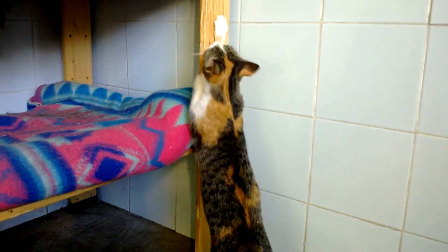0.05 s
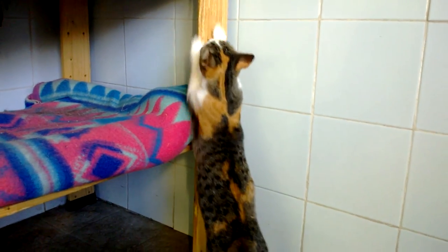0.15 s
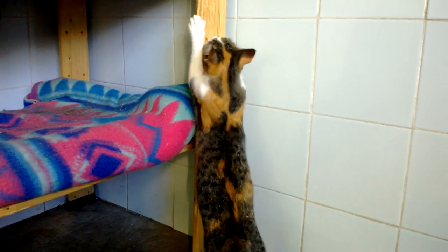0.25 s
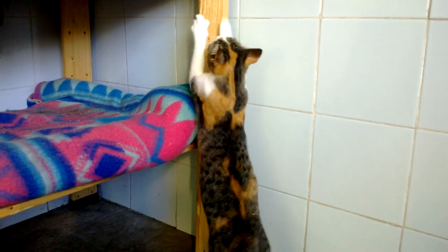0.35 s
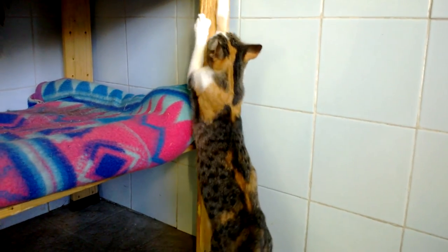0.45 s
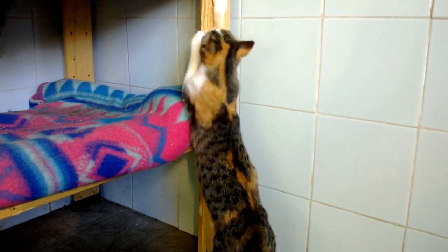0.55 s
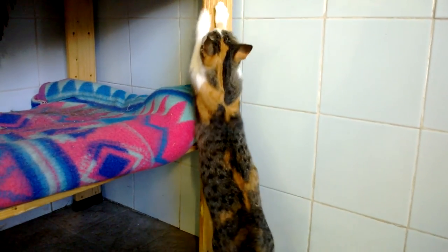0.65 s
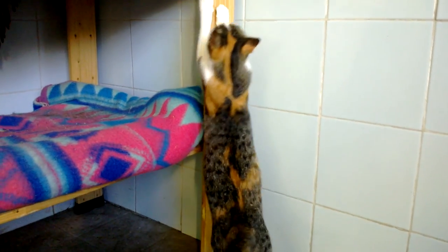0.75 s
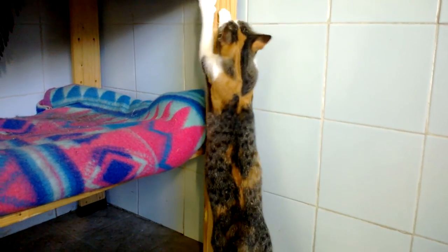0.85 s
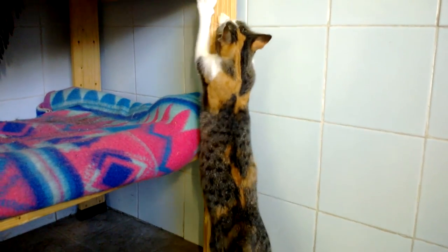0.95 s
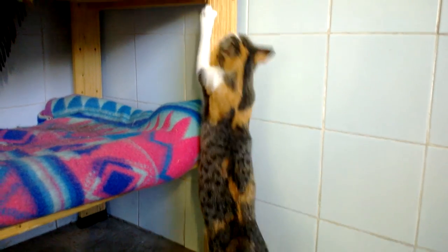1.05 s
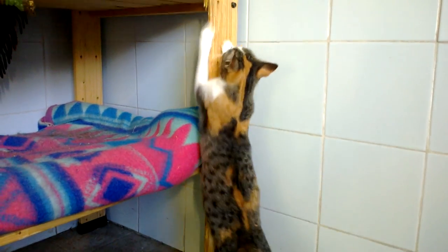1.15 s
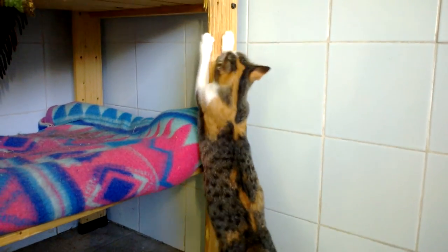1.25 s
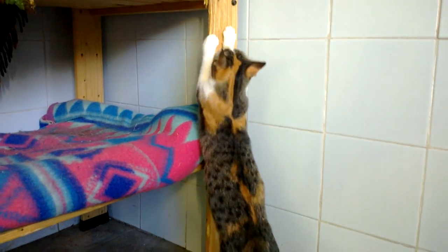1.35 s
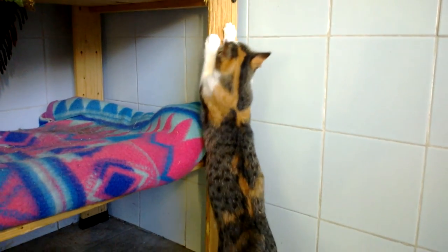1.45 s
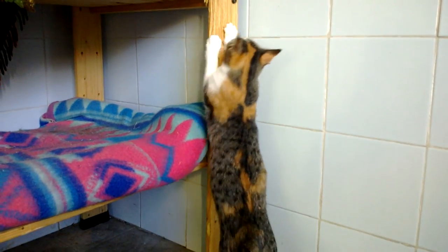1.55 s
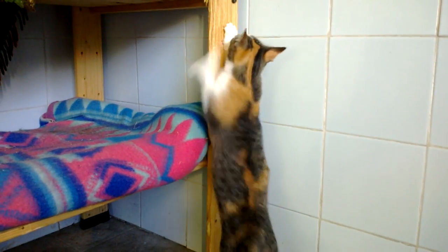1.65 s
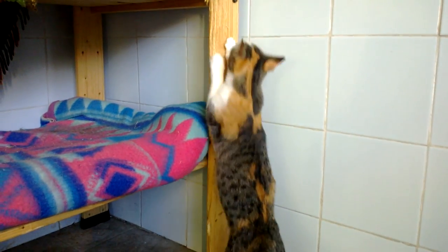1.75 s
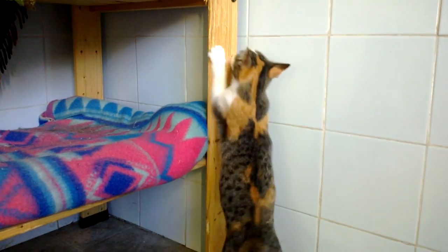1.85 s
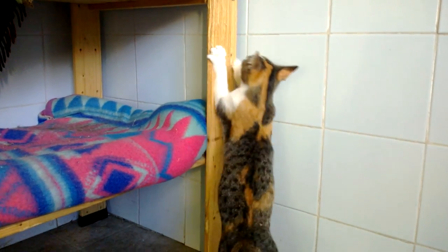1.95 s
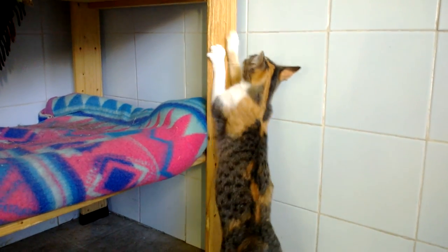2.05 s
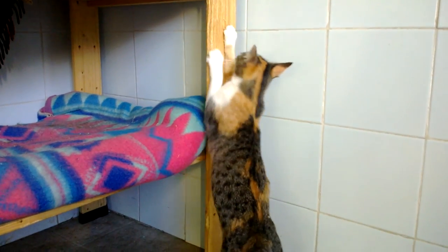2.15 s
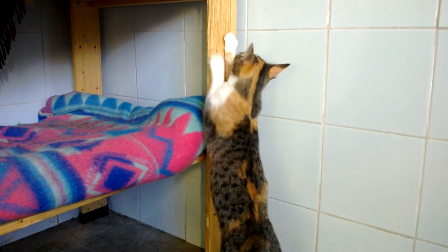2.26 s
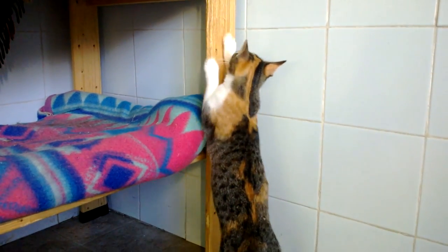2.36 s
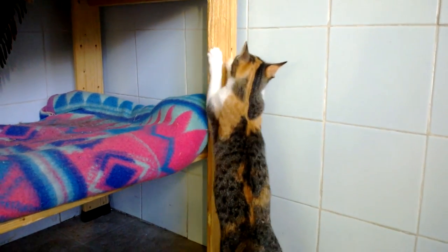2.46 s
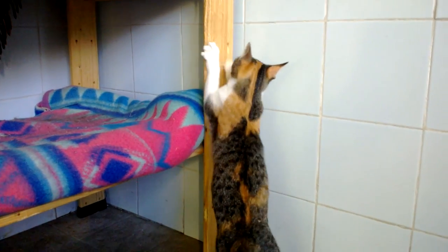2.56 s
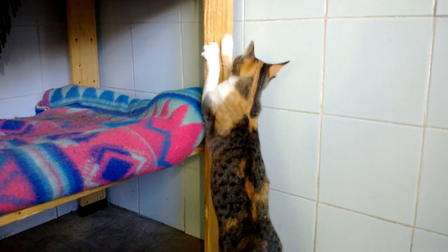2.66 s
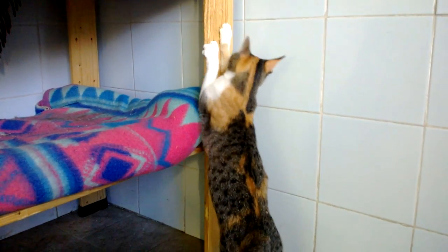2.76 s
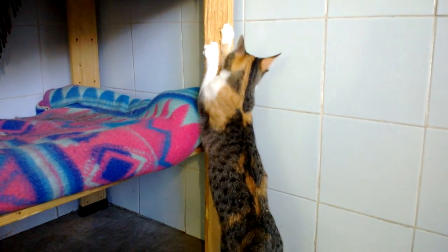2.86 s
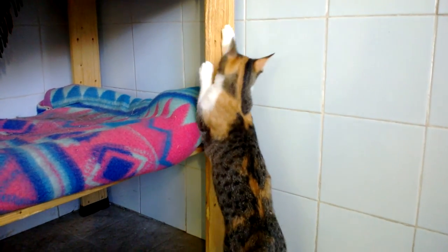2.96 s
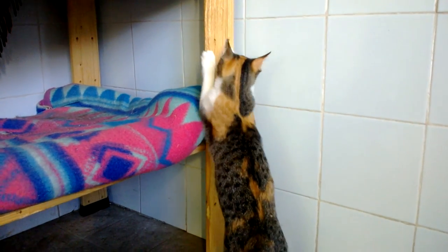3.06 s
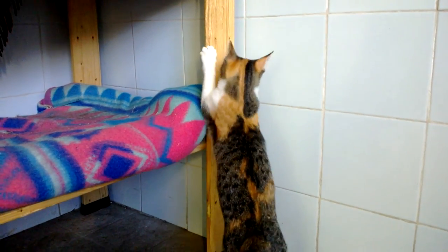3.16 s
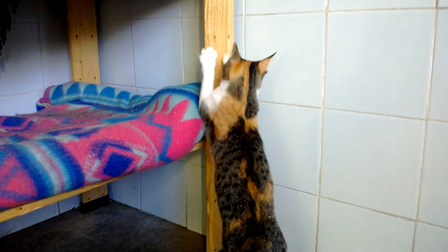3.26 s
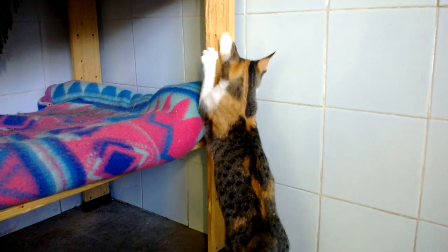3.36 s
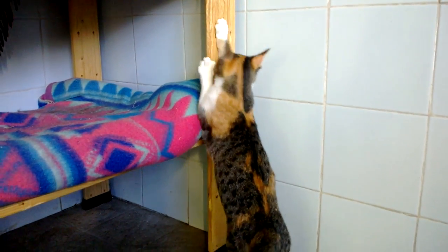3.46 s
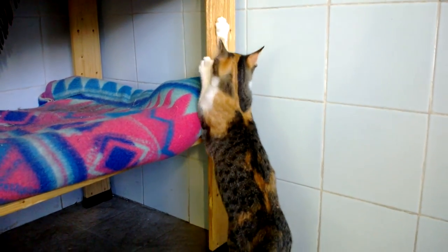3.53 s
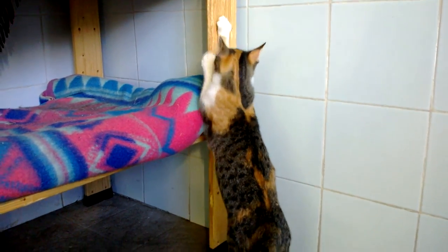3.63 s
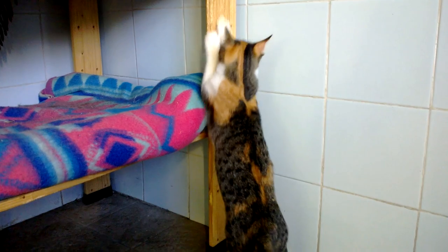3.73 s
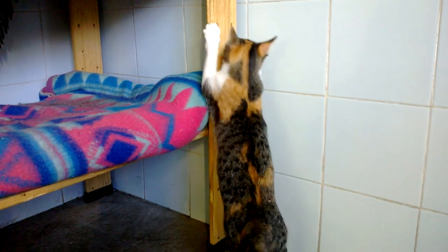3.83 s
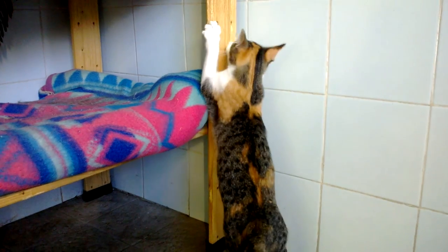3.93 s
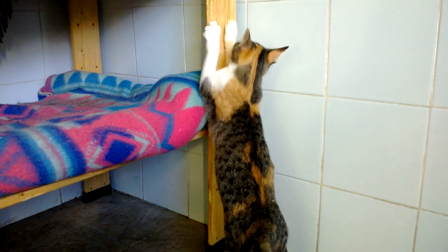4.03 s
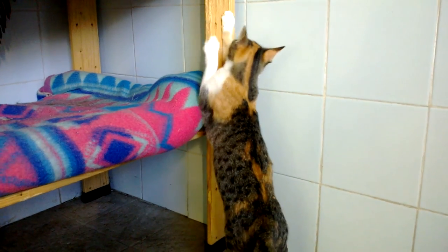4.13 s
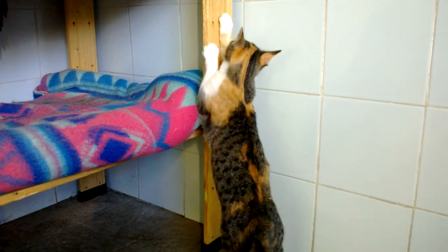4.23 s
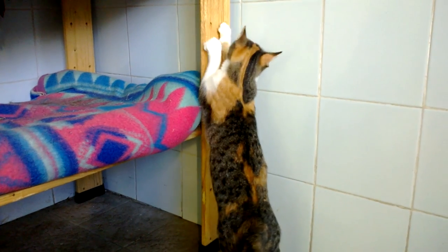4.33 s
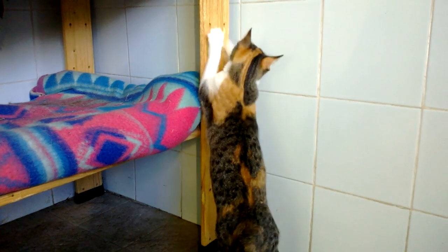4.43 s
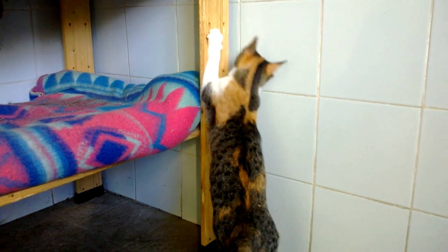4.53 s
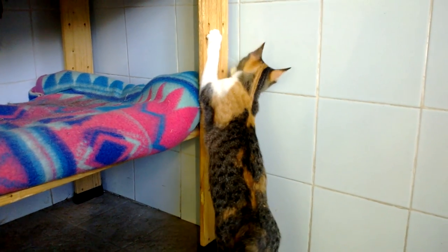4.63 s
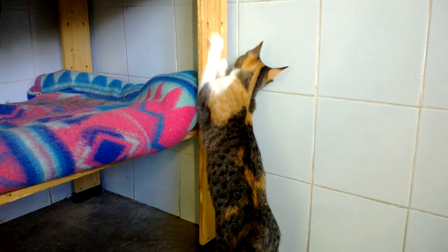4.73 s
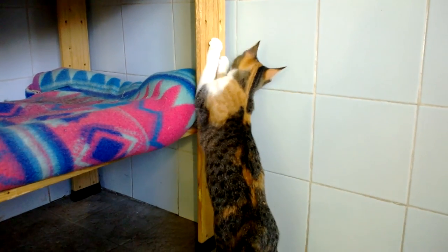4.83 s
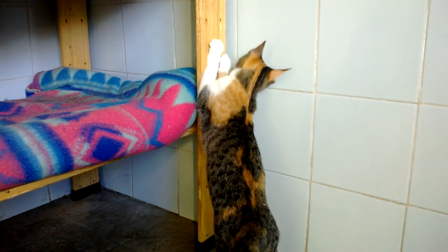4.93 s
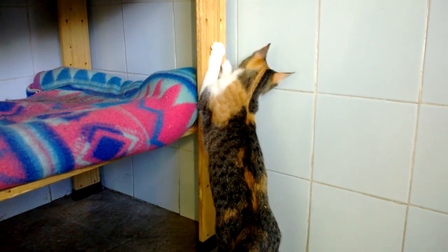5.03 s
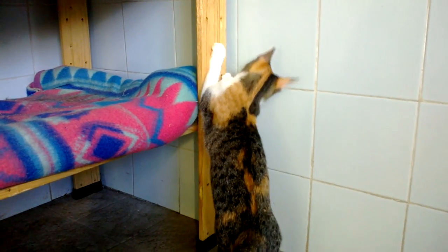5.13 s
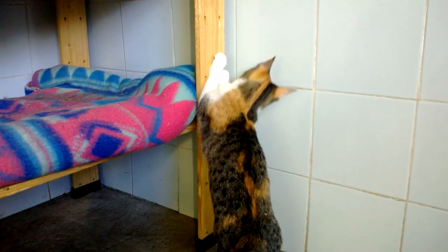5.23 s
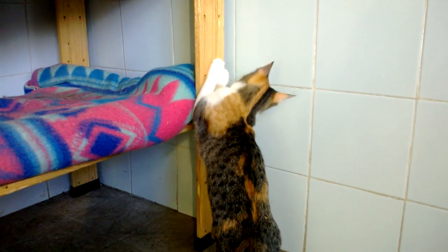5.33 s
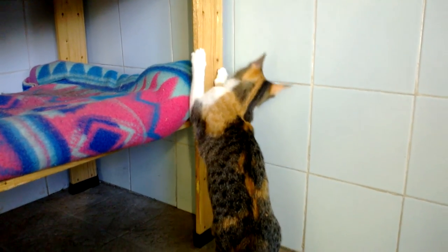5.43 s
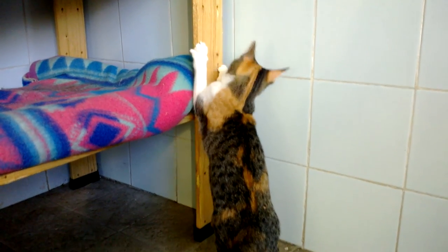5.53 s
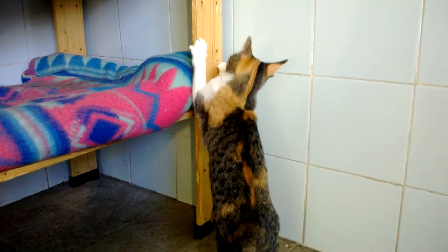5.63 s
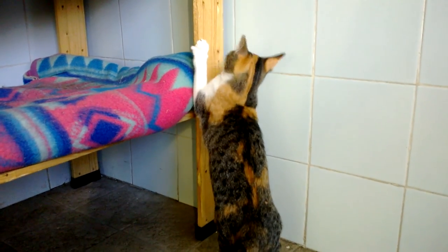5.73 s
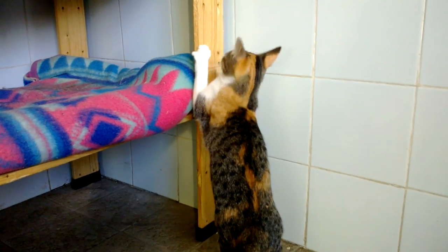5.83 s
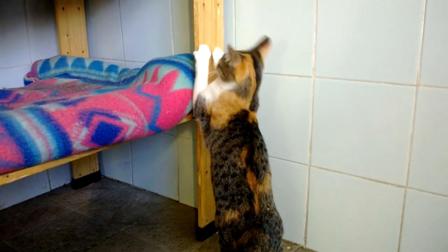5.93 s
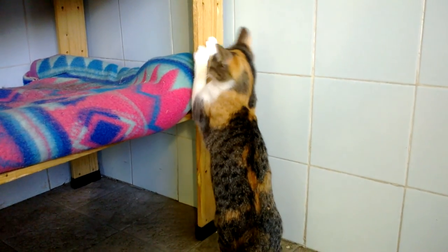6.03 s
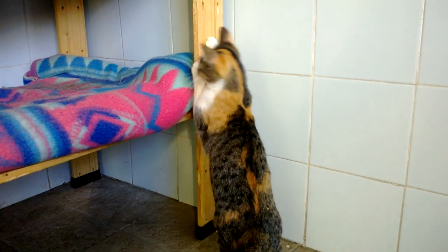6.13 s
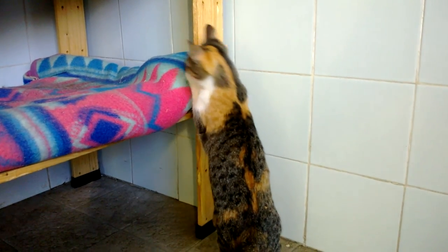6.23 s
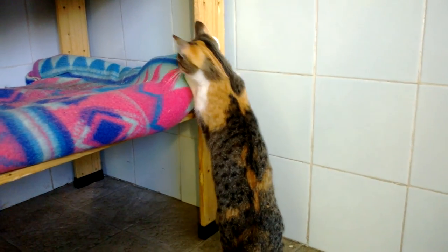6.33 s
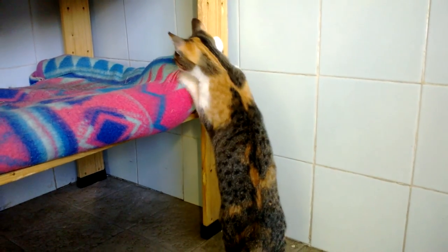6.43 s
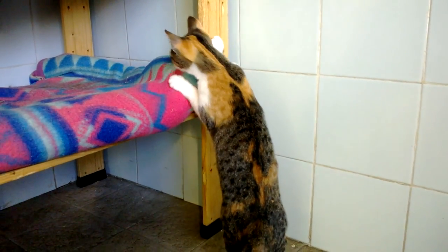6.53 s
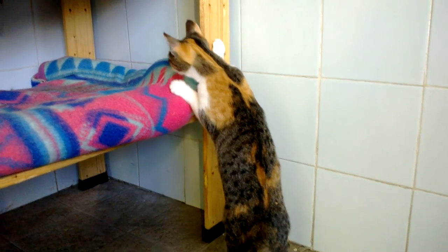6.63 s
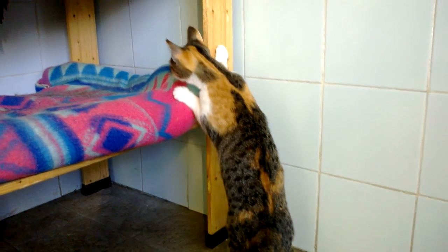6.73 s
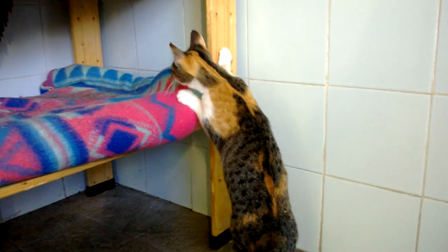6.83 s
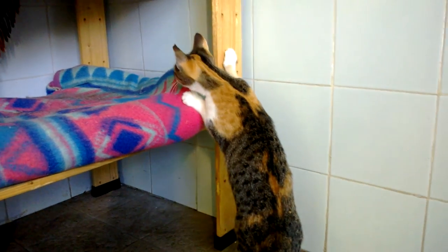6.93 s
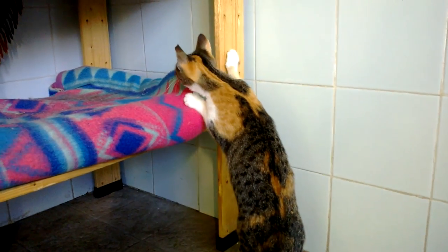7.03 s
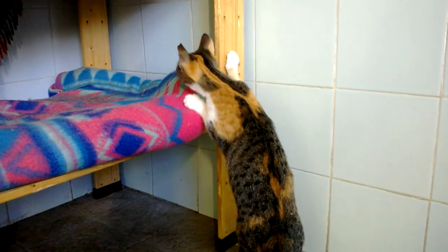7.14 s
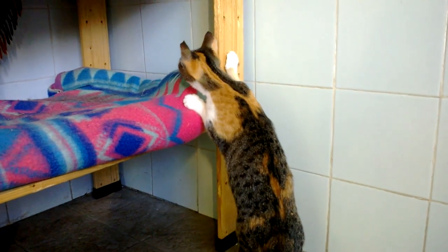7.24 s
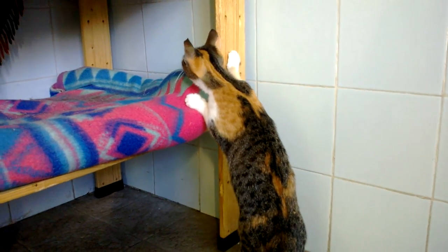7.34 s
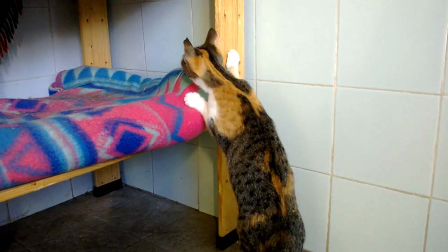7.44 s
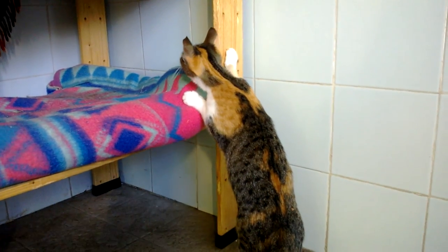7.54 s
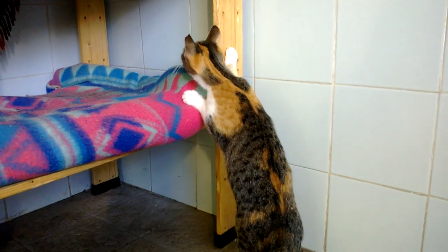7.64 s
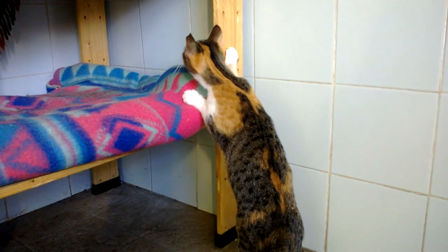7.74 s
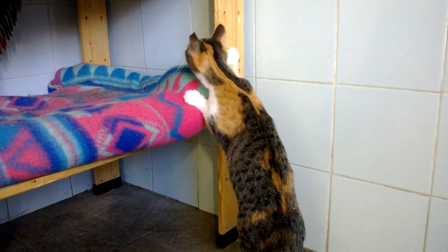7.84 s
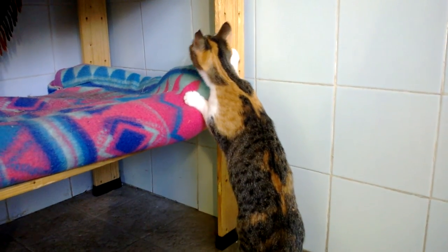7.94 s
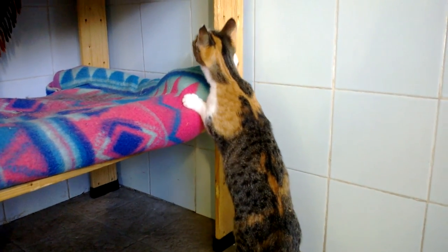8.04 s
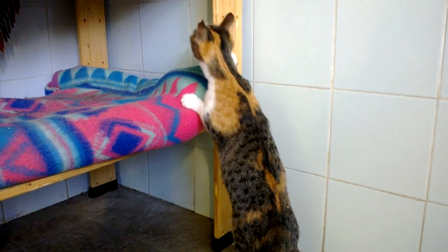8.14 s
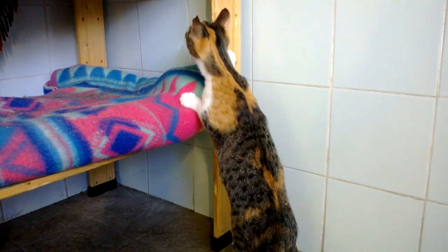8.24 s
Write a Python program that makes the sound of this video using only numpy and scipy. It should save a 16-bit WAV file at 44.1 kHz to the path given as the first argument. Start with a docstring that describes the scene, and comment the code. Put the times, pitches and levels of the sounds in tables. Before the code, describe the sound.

Close by, a cat scratches a wooden post in a small tiled room. Short raspy scrapes overlap with crisp ticks and woody knocks, uneven and busy, with brief hard echoes. A low rumble and a wavering bass hum swell softly underneath. After about five seconds the scratching thins, one loud snap follows, then only faint ticks remain while the hum grows.

```python
"""A cat stretches up a wooden bed post in a small tiled room and drags its claws down it.
From the start, filtered noise makes a soft room rumble, and a wavering sine hums in short swells.
Claws scrape (shaped noise) and snap free (short noise bursts); the post rings and the tiles echo.
From about 4.5 s a few faint breathy tones and soft rubs join in: noise through a ringing filter.
After about 5.3 s the hum stays and grows; the claws turn sparse, snap loudly near 5.7 s, then go faint."""
import sys
import numpy as np
from scipy import signal
from scipy.io import wavfile

SR = 44100
rng = np.random.default_rng(int(sys.argv[2]) if len(sys.argv) > 2 else 0)


def log_audio(samples):
    """Write samples as a 16-bit WAV file to the path given in sys.argv[1]."""
    # one column per channel
    frames = np.atleast_2d(samples).T
    # limit to full scale, then quantise
    limited = np.clip(frames, -1, 1)
    pcm = np.round(limited * 32767).astype(np.int16)
    wavfile.write(sys.argv[1], SR, pcm)


N = 365128   # length in samples, about 8.3 s


def from_db(db):
    """Turn decibels into a gain to multiply by."""
    return 10 ** (np.asarray(db) / 20)


def rms_one(x):
    """Scale a sound so its average strength (rms) is 1."""
    return x / np.sqrt(np.mean(x ** 2) + 1e-20)


def in_time(rows):
    """Draw straight lines between the rows of a table: one curve a column, one value a sample."""
    s, *columns = np.transpose(rows)
    return [np.interp(np.arange(N) / SR, s, column, right=column[-1]) for column in columns]


def at_hz(points, hz):
    """Read a spectrum at a frequency, with frequency on a log scale."""
    table_hz, values = np.array(points).T
    return np.interp(np.log(hz), np.log(table_hz), values)


def drift(rate_hz):
    """Slow random wandering of rms 1: smoothed noise, made at every 40th sample and joined by lines."""
    r = np.exp(-2 * np.pi * rate_hz * 40 / SR)
    noise = rng.standard_normal(N // 40 + 2002)
    slow = signal.lfilter([1], [1, -2 * r, r * r], noise)[2000:]   # skip the filter's start-up
    return np.interp(np.arange(N) / 40, np.arange(len(slow)), rms_one(slow))


# half-octave steps upward from 16 Hz
BAND_EDGES_HZ = 16 * 2 ** np.arange(0, 10.1, .5)


def bands(x, low_hz=0, high_hz=SR):
    """Split x into half-octave bands; signs alternate so that neighbours join without a notch."""
    for k, (low, high) in enumerate(zip(BAND_EDGES_HZ, BAND_EDGES_HZ[1:])):
        if low_hz < low < high_hz:
            sos = signal.butter(2, [low, high], "band", fs=SR, output="sos")
            yield np.sqrt(low * high), (-1) ** k * signal.sosfilt(sos, x)


def colour(x, spectrum, low_hz, high_hz):
    """Give x the part of a spectrum between two edges; white noise keeps about its rms."""
    power, out = 0, 0
    for hz, band in bands(x, low_hz, high_hz):
        level_db = at_hz(spectrum, hz)
        power += from_db(2 * level_db) * hz / SR
        out = out + from_db(level_db) * band
    return out / np.sqrt(power)


def ring(force, hz, t60_s):
    """Let a force shake a resonance: a unit click starts a sine of height 1 that dies away."""
    r, w = from_db(-60 / (t60_s * SR)), 2 * np.pi * hz / SR
    return signal.lfilter([0, np.sin(w)], [1, -2 * r * np.cos(w), r * r], force + 1e-18)


# tone of the room air, relative within each part: (pitch_hz, level_db per Hz)
AIR_SPECTRUM = [(8.8, -33), (15, -4.5), (33, -10), (55, -3.5), (70, -6), (94, -11), (199, -16.5),
                (463, -34), (759, -45), (985, -39.5), (1140, -47), (1570, -49.5), (5320, -53), (8460, -62),
                (15600, -86)]
# loudness of the rumble before a fixed lift: (time_s, level_db)
RUMBLE_LEVEL = [(0, -51.5), (.25, -45.5), (.8, -59.5), (1.15, -50), (1.6, -59), (2.5, -58.5), (3.2, -58.5),
                (4.2, -60.5), (4.6, -54), (5.2, -58), (6.1, -54), (7.49, -54.5), (8.28, -50)]
# loudness of the middle of the room air: (time_s, level_db)
MURMUR_LEVEL = [(0, -62), (3, -63), (6.3, -70.5), (6.8, -70.5), (7.2, -69.5), (7.7, -68), (8.2, -66)]
# loudness of the top of the room air: (time_s, level_db)
HISS_LEVEL = [(0, -76), (3, -73.5), (6.3, -78.5), (7.6, -78.5), (8.2, -79)]


def air():
    """Room air as filtered noise: patchy rumble below, a murmur in the middle, smooth hiss above."""
    white = rng.standard_normal(N)
    rumble = 0
    for hz, band in bands(white, 0, 350):
        rumble = rumble + from_db(at_hz(AIR_SPECTRUM, hz) + 1.77 * drift(2.2)) * band
    rumble = from_db(in_time(RUMBLE_LEVEL)[0] + 3.5) * rms_one(rumble)
    murmur_db = in_time(MURMUR_LEVEL)[0] + 0.84 * drift(4.1)
    murmur = from_db(murmur_db) * colour(white, AIR_SPECTRUM, 350, 2800)
    hiss = from_db(in_time(HISS_LEVEL)[0]) * colour(white, AIR_SPECTRUM, 2800, SR)
    return rumble + murmur + hiss


# lasting part of the hum, which stays and grows after the swells: (time_s, level_db)
HUM_LEVEL = [(0, -86), (5.33, -63), (5.45, -39), (5.56, -46), (5.63, -37.5), (5.68, -58.5), (5.9, -43.5),
             (6.09, -50), (6.13, -40.5), (6.37, -46), (6.43, -39), (6.52, -48), (6.57, -40), (6.87, -41.5),
             (7.03, -36.5), (7.19, -45.5), (7.43, -37), (8.21, -31), (8.28, -29.5)]
# short swells that come first: (middle_s, length_s, level_db)
HUM_SWELLS = [(0.088, 0.19, -55), (0.338, 0.24, -43), (0.551, 0.072, -39), (0.699, 0.044, -45),
              (0.79, 0.078, -45), (1.214, 0.25, -45.5), (1.383, 0.026, -37), (1.57, 0.062, -42),
              (1.776, 0.18, -48), (2.162, 0.13, -59), (2.702, 0.24, -49.5), (2.91, 0.09, -47),
              (3.314, 0.034, -44), (3.723, 0.26, -49.5), (4.558, 0.48, -41), (4.99, 0.18, -43),
              (5.266, 0.12, -42)]
# middle of the wavering pitch: (time_s, pitch_hz)
HUM_PITCH = [(0, 48), (2.5, 47.4), (3.7, 43), (4.5, 44.5), (5.2, 42.3), (5.9, 40.6), (7.2, 41.1),
             (7.5, 42.4), (8.28, 42.6)]


def hum():
    """A low sine whose pitch wavers, and a faint steadier sine above it."""
    t = np.arange(N) / SR
    size = from_db(in_time(HUM_LEVEL)[0])
    for middle, length, level_db in HUM_SWELLS:
        size = size + from_db(level_db) * np.cos(np.pi * np.clip((t - middle) / length, -.5, .5))
    pitch_hz = in_time(HUM_PITCH)[0] + 1.552 * drift(3.46)
    lower = np.sqrt(2) * size * np.sin(2 * np.pi * np.cumsum(pitch_hz) / SR)
    upper_size = from_db(-61.0 + 2.6 * drift(1.5))
    upper_hz = 88.5 + 0.6 * drift(0.84)
    return lower + upper_size * np.sin(2 * np.pi * np.cumsum(upper_hz) / SR)


# claw drags, with levels before the mix: (start_s, rise_s, hold_s, fade_t60_ms before the fade shares,
# rasp_db, sizzle_db, scrape_db, low_grind_db, lower_ring_db, upper_ring_db)
DRAGS = [(0.0, 0.00049, 0.064, 1200, -37.5, -51, -37, -38, -45, -41),
         (0.113, 0.024, 0.033, 560, -31.5, -44, -36.5, -35, -55, -35),
         (0.198, 0.011, 0.064, 370, -73, -68, -49, -42.5, -53, -68),
         (0.43, 0.019, 0.02, 340, -52.5, -61.5, -37, -43, -79, -72),
         (0.487, 0.045, 0.02, 210, -49.5, -67, -48, -50, -45, -36),
         (0.567, 0.017, 0.022, 250, -49.5, -89, -38.5, -70, -70, -37),
         (0.633, 0.027, 0.032, 330, -68, -78, -53.5, -58, -55, -80),
         (0.811, 0.024, 0.012, 200, -87, -73, -73, -74, -80, -85),
         (0.918, 0.0034, 0.017, 510, -46, -48, -43.5, -33.5, -47.5, -32),
         (0.96, 0.026, 0.029, 240, -51.5, -61, -47, -53, -59, -51),
         (1.089, 0.0056, 0.034, 260, -45.5, -56.5, -40, -56, -44, -64),
         (1.112, 0.015, 0.016, 380, -74, -83, -48.0, -46.5, -60, -68),
         (1.175, 0.015, 0.017, 260, -67, -85, -66, -52, -49, -70),
         (1.226, 0.0069, 0.026, 370, -55.5, -85, -47, -69, -46, -58),
         (1.363, 0.025, 0.16, 250.0, -78, -98, -75, -78, -80, -65),
         (1.576, 0.0045, 0.026, 280, -62, -91, -57, -54, -81, -75),
         (1.597, 0.0091, 0.036, 400, -42, -50.5, -36, -39, -44, -46),
         (1.662, 0.025, 0.037, 480, -55, -84, -43, -62, -34, -42),
         (1.756, 0.03, 0.023, 310, -41, -58.5, -31, -38, -34, -33),
         (1.803, 0.014, 0.048, 330, -51, -62.5, -35, -37.5, -32, -46),
         (2.045, 0.012, 0.027, 320, -57.5, -73, -40.5, -34, -58, -52),
         (2.103, 0.0063, 0.033, 300, -48, -80, -45, -46, -63, -44),
         (2.163, 0.027, 0.028, 370, -61, -69, -51, -50, -52, -32.5),
         (2.223, 0.015, 0.023, 230, -60, -69, -58, -43.5, -63, -56),
         (2.286, 0.052, 0.037, 280, -54.5, -68, -42.5, -46, -58, -42),
         (2.397, 0.014, 0.049, 210, -55.5, -77, -44, -64, -42, -38.5),
         (2.488, 0.005, 0.015, 560, -54, -71, -49, -62, -54, -42.5),
         (2.578, 0.0026, 0.016, 380, -54, -66, -39.5, -39.5, -73, -78),
         (2.765, 0.037, 0.032, 250.0, -74, -90, -72, -67, -84, -67),
         (2.863, 0.0038, 0.035, 450, -55.5, -68, -46, -42.5, -61, -48),
         (2.941, 0.026, 0.073, 530, -58.5, -70, -46.5, -51, -47, -43),
         (3.065, 0.013, 0.059, 300, -68, -78, -56, -72.5, -51, -40.5),
         (3.22, 0.023, 0.034, 89, -63.5, -73, -50, -74, -61, -53),
         (3.367, 0.021, 0.027, 430, -48, -54, -30, -28.5, -33.5, -23),
         (3.404, 0.021, 0.016, 480, -44, -67, -47.5, -52, -43, -28.5),
         (3.537, 0.0037, 0.008, 170, -59, -85, -51, -70, -63, -56),
         (3.606, 0.0084, 0.012, 410, -58.5, -76.0, -51, -55, -67.0, -40.5),
         (3.699, 0.043, 0.044, 360, -47, -59, -37, -39, -37, -44),
         (3.975, 0.11, 0.049, 310, -60.5, -70.5, -48.5, -47.5, -53.5, -72),
         (4.168, 0.0059, 0.039, 500, -51, -87, -44, -46, -44, -48),
         (4.259, 0.0096, 0.039, 240, -54.5, -70, -47, -42, -56, -35),
         (4.364, 0.014, 0.023, 180, -48, -56.5, -39.5, -34.5, -39, -67),
         (4.404, 0.011, 0.073, 340, -43, -58.5, -34.5, -39, -46, -31),
         (4.521, 0.015, 0.026, 360, -63, -91, -51, -55, -38, -65),
         (4.687, 0.035, 0.012, 275, -46, -56, -45, -37, -39, -58),
         (4.741, 0.017, 0.0068, 130, -54, -84, -51, -72, -32.5, -74),
         (4.861, 0.0033, 0.0083, 240, -52, -82, -43, -77, -41.5, -44),
         (4.88, 0.014, 0.0089, 320, -68, -89, -69, -66, -66, -38),
         (4.926, 0.035, 0.028, 280, -54, -68.5, -46.5, -48.5, -70, -57),
         (4.994, 0.04, 0.034, 230, -55, -67, -35, -59, -35.5, -78),
         (5.111, 0.029, 0.025, 310, -49, -60, -39.5, -53, -45, -39),
         (5.362, 0.0057, 0.02, 280, -55.5, -71, -50.5, -51, -69, -78),
         (5.426, 0.041, 0.025, 140, -66, -78.0, -48, -61, -45, -80),
         (5.681, 0.0013, 0.018, 310, -43, -53, -36, -42.5, -45, -78),
         (5.718, 0.023, 0.049, 370, -59, -72, -64, -54, -49, -74),
         (5.998, 0.046, 0.021, 420, -61, -73, -61, -49.5, -64, -41.5),
         (6.132, 0.018, 0.026, 290, -68, -77, -59.5, -58, -62, -65),
         (6.241, 0.011, 0.043, 98, -69, -89, -51.5, -46.5, -55.5, -57),
         (6.68, 0.074, 0.16, 210, -89, -90.5, -80, -72, -81, -92),
         (6.926, 0.0058, 0.029, 710, -73.5, -92, -71, -60, -89, -90)]
# speed of the fade in each level column, as a multiple of the drag's own; sizzle dies fastest
FADE_SHARE = [1.54, 2.8, 1.31, 1.51, 1.66, 2.1]


def drags():
    """One loudness curve for each level column: every drag rises, holds and dies away."""
    out, t = np.zeros((len(FADE_SHARE), N + SR)), np.arange(SR // 2) / SR
    for start_s, rise, hold, fade_ms, *levels_db in DRAGS:
        fading_s = np.maximum(t - rise - hold, 0)
        faded_db = np.outer(FADE_SHARE, 60 / (fade_ms / 1000) * fading_s)
        attack = np.minimum(t / max(rise, .001), 1) ** 2
        start = int(start_s * SR)
        out[:, start:start + len(t)] += attack * from_db(np.c_[levels_db] - faded_db)
    return out[:, :N]


CATCHES_PER_S, CATCH_MS, CATCH_DEPTH = 100, 2.5, 1.05


def catches():
    """Claws catch and let go at random while they drag: short jumps in force that die away."""
    jolts = (rng.random(N) < CATCHES_PER_S / SR) * rng.random(N)
    r = np.exp(-1000 / (CATCH_MS * SR))
    return rms_one(1 + CATCH_DEPTH * signal.lfilter([1], [1, -r], jolts))


def fibres(per_s, spread_db, clump_db):
    """Wood fibres break at random, in clumps, with uneven force: clicks of rms 1."""
    sizes = from_db(spread_db * np.minimum(rng.exponential(1, N), 4)) * rng.choice([-1, 1], N)
    breaks = rng.random(N) < per_s / SR
    return rms_one(sizes * breaks * from_db(clump_db * drift(30)))


# ringing tones of the post: (pitch_hz, level_db before the mix, t60_s before the cap below)
POST_MODES = [(284, -7.5, 0.089), (317, -1.5, 0.08), (362, -3, .1), (419, -3, 0.083), (467, 3, 0.07),
              (609, -3.5, 0.076), (708, -7, .1), (784, -3, 0.18), (859, -7.5, .08), (1043, -17, .08),
              (1102, 3.5, 0.23), (1131.3, 7, 0.1), (1450, -24, 0.067), (1490, -13, .1),
              (1577, -10.5, 0.085), (1616.5, 3.5, 0.16), (1650, -16.5, 0.15), (1726, -31.5, .08),
              (2000, -23.5, 0.074), (2320, -7, 0.12), (2697, -3, 0.049), (3033, -23, 0.074),
              (3422, -2, 0.047), (3886, -5, 0.011), (3820, -17.5, .05), (3940, -24, 0.042),
              (4840, -3, 0.027), (5830, -10, 0.039), (5910, -27.5, 0.046)]
LONGEST_RING_S = .075   # longest ring allowed for any mode
FLUTTER_DB, FLUTTER_HZ = 4, 22   # random flutter in the level of the ring


def post_ring(groups):
    """The wooden post rings at its own pitches; each mode is shaken by the force of its group."""
    out = np.zeros(N)
    for hz, level_db, t60_s in POST_MODES:
        force = next(force for top_hz, force in groups if hz < top_hz)
        wander = from_db(2 * drift(5) + 2 * drift(25))
        flutter = from_db(np.minimum(FLUTTER_DB * drift(FLUTTER_HZ), 3))
        out += flutter * ring(from_db(level_db - 35.5) * wander * force, hz, min(t60_s, LONGEST_RING_S))
    return out


# claws snapping free, with levels and decay before the mix and stretch:
# (time_s, crack_db, post_knock_db, low_thud_db, decay_ms)
SNAPS = [(0.1356, -42, -44, -56, 4.7), (0.338, -48, -67, -65, 2.2), (0.4417, -42, -28, -35, 0.46),
         (0.464, -33.5, -50, -60, 3), (0.5315, -34, -26.5, -39, 7.5), (0.579, -31.5, -41, -42, 3.1),
         (0.677, -46.5, -43, -49, 4.7), (0.836, -46, -74, -57, 7.7), (0.922, -13, -13.5, -28.5, 3),
         (0.987, -28, -25, -62, 2.4), (1.095, -23, -63, -58.5, 1.6), (1.2074, -55, -39, -49, 8.3),
         (1.236, -34, -28.5, -41, 3.2), (1.2473, -31.5, -58, -66, 4.7), (1.396, -44.5, -43, -72, 2.2),
         (1.4746, -56, -61, -72, 4), (1.537, -53, -65, -70, 3.4), (1.5676, -33, -66, -37, 4.3),
         (1.6023, -15, -17.5, -21.5, 4.9), (1.6834, -34, -43, -42, 7.4), (1.711, -29.5, -29, -35, 7.4),
         (1.7724, -49, -40, -54, 3.1), (1.788, -34.5, -54, -53, 29), (1.816, -28.5, -15, -60, 2.6),
         (1.8306, -29, -40, -60, 5.6), (1.927, -43, -55, -65, 4), (2.0109, -53, -65, -63, 5.5),
         (2.038, -31, -21, -28.5, 5.9), (2.0612, -31, -48, -46, 4.6), (2.109, -25, -34, -40, 4.2),
         (2.1917, -38.5, -23.5, -70, 9.2), (2.25, -53, -51, -64, 3), (2.309, -40.5, -59, -67, 10),
         (2.336, -42, -42, -57, 7.1), (2.385, -52, -45, -65, 2.8), (2.412, -40, -27, -70, 5.9),
         (2.428, -38, -40, -65, 3), (2.4973, -28.5, -48, -53, 4.9), (2.579, -31, -57, -57, 6.6),
         (2.7146, -63, -40, -58, 5.9), (2.788, -50, -65, -73, 2.9), (2.806, -47.5, -64, -63, 5),
         (2.8678, -32, -63, -36, 5.7), (2.905, -52, -55, -65, 3), (2.9603, -41.5, -52, -57, 5.1),
         (3.027, -57, -60, -63, 3), (3.082, -45.5, -37, -61, 4.2), (3.2097, -43.5, -57, -49.5, 5.2),
         (3.242, -48, -58, -49, 11), (3.3779, -21, -21.5, -47, 4.5), (3.3894, -18, -32, -50, 6.1),
         (3.4106, -15.5, -41, -60, 2.9), (3.427, -19.5, -39.5, -60, 6.3), (3.5485, -35, -48.5, -61, 3.8),
         (3.621, -36.5, -48, -49, 2.9), (3.708, -42, -63, -39, 9.5), (3.7332, -31, -54, -21, 1.8),
         (3.758, -26, -18, -63, 4.1), (4.063, -50, -51, -51, 4.4), (4.15, -42, -56, -58, 3.5),
         (4.178, -24, -22, -55, 5.4), (4.257, -41, -60, -65, 3.6), (4.2685, -28, -12, -68, 2),
         (4.3762, -27, -54.5, -61, 3.9), (4.396, -30, -24, -60, 4), (4.4057, -26, -63, -58, 5.1),
         (4.435, -36, -10.5, -60, 5.1), (4.448, -36, -27, -60, 1.8), (4.46, -30, -40, -60, 1.3),
         (4.476, -25, -45, -60, 2.5), (4.4834, -17, -24, -55, 2.7), (4.604, -45, -69, -54, 5),
         (4.7013, -35, -28, -34.5, 17), (4.72, -31.5, -26.5, -60, 9.8), (4.779, -45, -48, -68, 3.3),
         (4.827, -42, -60, -70, 2.8), (4.855, -36.5, -53, -85, 4.6), (4.867, -31, -51, -70, 3),
         (4.916, -42, -39, -67, 4.1), (4.9822, -47, -53, -66, 4), (5.024, -42, -60, -32, 6.3),
         (5.035, -31.5, -54, -48, 3.7), (5.129, -33.5, -50, -34.5, 11), (5.147, -41, -53, -60, 3.6),
         (5.336, -43, -47, -67, 6), (5.349, -29, -33.5, -70, 6.4), (5.459, -48, -48, -51, 7.6),
         (5.582, -52.5, -70, -57, 3.1), (5.672, -14.5, -15, -26, 4.6), (6.008, -55, -79, -70, 6.7),
         (6.0274, -51, -55, -66, 7.3), (6.041, -52, -39, -56, 2.8), (6.0605, -57, -28.5, -65, 5.3),
         (6.145, -49, -61, -63, 3.3), (6.1665, -49, -53, -66.5, 3.3), (6.2525, -46.5, -55.5, -66, 5),
         (6.93, -54, -52, -72, 4.3), (8.137, -55, -47, -44, 2.1)]


def bursts(levels_db, stretch, rise_ms):
    """Loudness curve that rises at each snap and dies away; stretch lengthens or shortens the decay."""
    out = np.zeros(N)
    for (s, *_, decay_ms), level_db in zip(SNAPS, levels_db):
        decay = max(stretch * decay_ms, .5) * SR / 1000   # in samples
        start, step = int(s * SR), np.arange(int(8 * decay))
        shape = np.exp(-step / decay) * (1 - np.exp(-step / (rise_ms * SR / 1000)))
        out[start:start + len(shape)] += from_db(level_db) * shape
    return out


# claw tips: range of pitches, ring length in cycles, level trim, random change from snap to snap
TIP_HZ, TIP_CYCLES, TIP_DB, TIP_SPREAD_DB = (2388, 7540), 67, -33, 7.5


def claw_tips(splinter):
    """Each snap sets short high rings going, with a new random balance every time."""
    pitches = np.geomspace(*TIP_HZ, 16) * rng.uniform(.97, 1.03, 16)
    share_db = np.minimum(TIP_SPREAD_DB * rng.standard_normal((len(SNAPS), 16)), 10)
    crack_db = np.transpose(SNAPS)[1] + TIP_DB
    rings = np.zeros(N)
    for k, hz in enumerate(pitches):
        level_db = crack_db + share_db[:, k] - 4 * np.log2(hz / 2400)   # higher tips are softer
        force = splinter * bursts(level_db, stretch=0.7, rise_ms=0.62)
        rings += ring(force, hz, TIP_CYCLES / hz)
    return signal.sosfilt(signal.butter(4, [2000, 8500], "band", fs=SR, output="sos"), rings)


# tone of splintering fibres, relative within each part: (pitch_hz, level_db per Hz)
RASP_SPECTRUM = [(88, -44), (150, -27.5), (269, -39.5), (463, 41), (620, 32.5), (931, 4.5), (1090, 20),
                 (1320, 3.5), (1640, 5.5), (1990, -0.5), (6010, -10), (12100, -10), (15600, -44.5)]
# ring colour of the post over time, as the level of each group of modes (deep also sets the low thud noise):
# (time_s, deep_db, boxy_db, hollow_db, hard_db, bright_db, sharp_db, thin_db)
RING_COLOUR = [(0.06, -2, -1.5, 0, 6, -15, -3, 3), (0.18, 6, -5, -3, -4, 3.5, 12, -10),
               (0.34, 7, -1, -5.5, -12, 2, 9, -4.5), (0.47, -1, 15, 12, 14, 3, 7, -4.5),
               (0.58, 11, -11.5, -1.5, 2, 3.5, -2, -15), (0.78, 16.5, -4, 6.5, 8, -17, 2, -3.0),
               (1.0, 14.5, 7, 3, 5, -5, -5, -20), (1.16, 13.5, 10, -14, -2, -12, 16, -18),
               (1.31, 12, -8, 0, 1.0, -12, 7, -6), (1.5, -5, 3, 13, -6, 7, 0, -8.0),
               (1.64, 14, 12.5, 6.5, 3.5, -27, -2.5, -8), (1.72, 2, -1, 12.5, 6, -7.5, 2.5, -9),
               (1.83, -12, 3.5, 0, -2, 5, 1, -27), (1.97, -2, 2, 12.5, -8, 9, 2, -4.5),
               (2.07, -3, 5.5, 1, -4, -4.5, 5, 1), (2.14, 14, -10, 7.5, -3, -10, -7, 5),
               (2.24, 13, -5, 6, 8, -1, -1, 0), (2.35, 5, 8.5, -4, 4, 12, -6, 4),
               (2.45, -1.0, 5, -3, 6, 8, 4, -4), (2.53, 2.0, 14, 0, 1, -23, 6, 14),
               (2.63, 8, -2, 7.5, 9, -2, -7, -1), (2.78, 17, 0, 4.0, 4, -8, -3, 1.0),
               (2.91, 3, 1, 4.5, 5, -6, 2, -3), (3.01, 5.5, 6.5, 1, -5, 6, 8, 13),
               (3.13, 8.5, 6.5, -4, 19, 3, -1, 12.5), (3.29, 6, -7, 9, -9, -12, 14.5, 16.5),
               (3.41, -24, -22.5, 11, 7, -19, -8, 11), (3.5, -11, 5.5, 4.5, 16, 5, -8, -1.5),
               (3.62, -1, 7.5, -2, -5.5, 11, 1, 15), (3.78, -11, 1.5, 2, 4, -2, 4, 3),
               (3.95, 5, 3, -1, 1.0, -3, 12, 15), (4.11, 12, -7, -8, -23, 1, 9, 6),
               (4.21, 16, -9, -20, 3, 19, -8, -19), (4.31, 2, -5, 9, 20, -1, 1, 7.5),
               (4.44, -14, 3, -17, -14, 3, -21, 0), (4.6, -5, 21, -13, 4, 8, -11, -14),
               (4.73, -2, -8, 7, -8, 7, -9, 1.0), (4.81, -8.0, -14, 5, 2.0, 19, 31, 12),
               (4.89, -2.0, 9, -15, -3.0, 12, 17, 4), (4.98, -9.0, 9.5, -2, 8, 10.5, 4, 1),
               (5.07, -19, 3, -15, 10, 15.5, 8, 12), (5.19, -14, 0, -4, -3, 1, -3, 20),
               (5.29, 1.5, 20, -3.0, -3, 20, 4, 3), (5.39, 9, 12, 0, -4, 3, -12, 17),
               (5.55, -14, 16.5, 10, -6, 7, 3, -5), (5.72, -40, 14, 2, -2, -14.5, -4, 3),
               (5.89, 0, 3, 0, 12, -19, 3, 15), (6.07, 12, -20, -1, 14, -4, 7, -1),
               (6.19, 15, -27, 3, -5.0, -3, 5, -7), (6.32, -1, -17, 9, -11, 2, 3, -5),
               (6.55, 0.5, -6.5, 0, 4, -2.0, 4, 2), (6.81, -1, -9, 20, 2.5, -1.0, -1.5, 2.0),
               (7.01, 7, -4, 4, -6.5, 1.5, 1.0, -3.5)]


def claws():
    """Snaps and drags tear fibres: a broad rasp, and a force that drives the modes of the post."""
    tearing = fibres(per_s=6000, spread_db=2.0, clump_db=0.66)
    rasp, sizzle, scrape, grind, lower, upper = tearing * drags()
    caught = catches()
    rasp, sizzle, scrape = rasp * caught, sizzle * caught, scrape * caught
    lower, upper = lower * caught, upper * caught

    # a snap is a dense burst of breaks; its low sound builds later and lasts longer
    splinter = rng.standard_normal(N)
    crack_db, knock_db, thud_db = np.transpose(SNAPS)[1:4]
    crack = splinter * bursts(crack_db - 12, stretch=0.65, rise_ms=0.68)
    knock = splinter * bursts(knock_db - 12, stretch=2.22, rise_ms=6.9)
    thud = splinter * bursts(thud_db - 6.5, stretch=3.2, rise_ms=5.9)
    low = thud + from_db(-4.5) * grind
    deep, boxy, hollow, hard, bright, sharp, thin = from_db(in_time(RING_COLOUR))

    # the broad noise of tearing, from low to high
    out = from_db(-9) * colour(deep * thud, RASP_SPECTRUM, 100, 300)
    high_pass = signal.butter(4, 370, "high", fs=SR, output="sos")
    out += from_db(-3) * signal.sosfilt(high_pass, colour(low, RASP_SPECTRUM, 300, 700))
    out += colour(knock + from_db(-5) * scrape, RASP_SPECTRUM, 700, 2000)
    out += from_db(-1.5) * colour(from_db(-12) * crack + rasp, RASP_SPECTRUM, 2000, 5500)
    out += colour(from_db(-12.5) * crack + sizzle, RASP_SPECTRUM, 5500, SR)

    # each group of modes is driven by its own force: (top pitch in Hz, force)
    groups = [(400, deep * (thud + from_db(-15) * grind)),
              (500, boxy * low),
              (1000, hollow * from_db(-8.5) * (low + scrape)),
              (1250, knock + lower),
              (2000, knock + upper),
              (2400, hard * from_db(4) * (crack + rasp)),
              (3200, bright * from_db(4) * (crack + rasp)),
              (5000, sharp * (crack + from_db(-4) * rasp)),
              (SR, thin * (from_db(9) * crack + rasp))]
    return out + claw_tips(splinter) + post_ring(groups)


# how long the tiled room echoes: (pitch_hz, t60_s)
TILES = [(150, 0.5), (500, 0.37), (1500, 0.33), (4000, 0.082), (10000, 0.042), (16000, 0.27)]
TILES_DB = -12


def tiles(x):
    """Dense echoes: noise that builds in a few ms and dies band by band."""
    t = np.arange(int(.6 * SR)) / SR
    tail = np.zeros(len(t))
    for hz, band in bands(rng.standard_normal(len(t))):
        tail += band * from_db(-60 * t / at_hz(TILES, hz))
    tail *= 1 - np.exp(-(t / 0.0031) ** 2)
    return signal.fftconvolve(x, tail / np.sqrt(np.sum(tail ** 2)))[:N]


# faint breathy ringing tones and soft rubs: (start_s, length_s, pitch_hz, ring_t60_ms, level_db)
BREATHY_TONES = [(4.488, 0.25, 2220, 9.2, -54.5), (6.673, 0.27, 1000, 6.7, -69),
                 (6.919, 0.029, 910, 8.4, -60.5), (6.922, 0.035, 2800, 3.2, -65.5),
                 (6.924, 0.076, 4000, 2.5, -78), (6.929, 0.15, 2340, 16, -78), (7.52, 0.11, 2250, 17, -72)]


def breathy_tones():
    """Noise through a resonance that holds its pitch; a short ring makes a wide, soft rub."""
    out, noise = np.zeros(N), rng.standard_normal(N)
    for start_s, length_s, hz, ring_ms, level_db in BREATHY_TONES:
        start, count = int(start_s * SR), int(length_s * SR)
        tone = rms_one(ring(noise, hz, ring_ms / 1000))[start:start + count]
        out[start:start + count] += from_db(level_db) * np.sqrt(np.hanning(count)) * tone
    return out


def scene():
    """Claws and breathy tones near by, their echo, the hum and the air."""
    post = claws() + breathy_tones()
    return (post + from_db(TILES_DB) * tiles(post) + hum() + air())[None]


MICROPHONE_HISS_DB, CUTOFF_HZ = -81.5, 16400


def record(dry):
    """The microphone adds its own even hiss; a steep filter cuts the top."""
    noisy = dry + from_db(MICROPHONE_HISS_DB) * rng.standard_normal(N)
    return signal.sosfilt(signal.cheby2(12, 70, CUTOFF_HZ, fs=SR, output="sos"), noisy)


dry = scene()
out = record(dry)
log_audio(out)
```